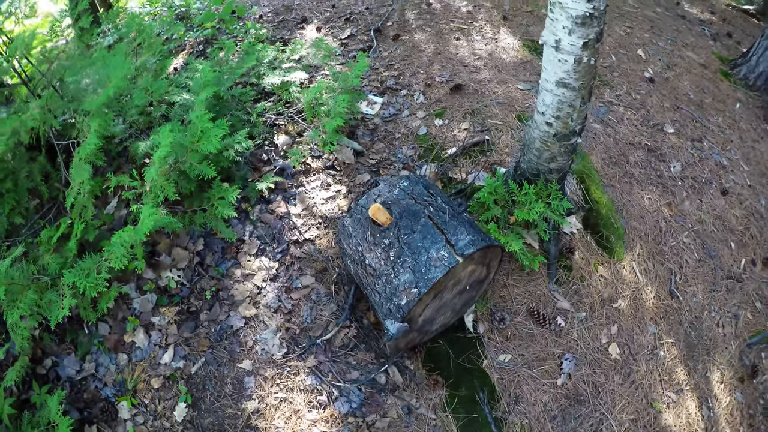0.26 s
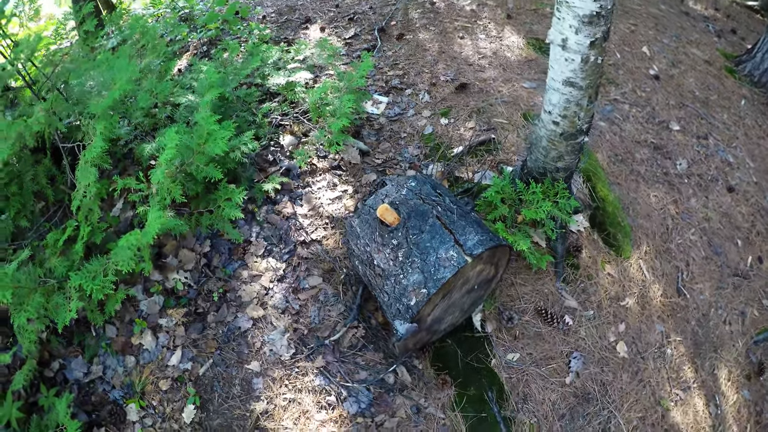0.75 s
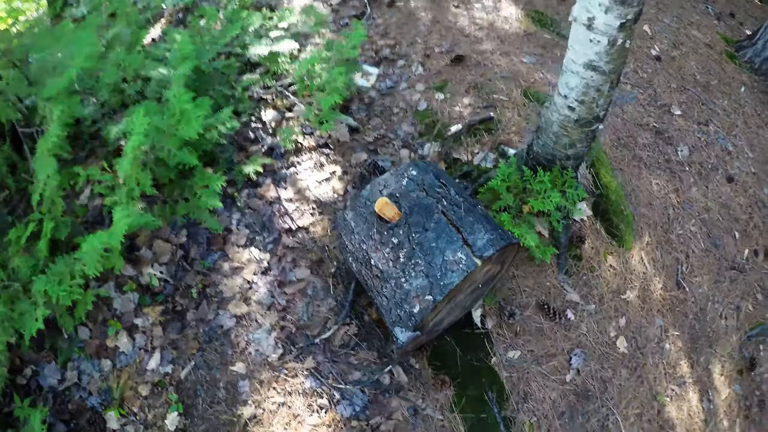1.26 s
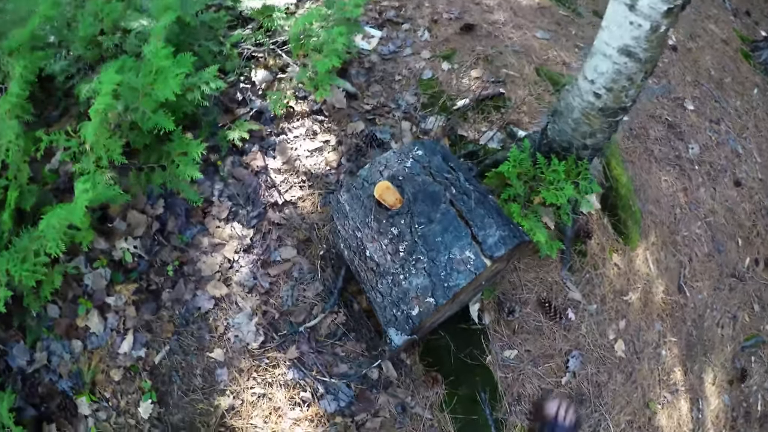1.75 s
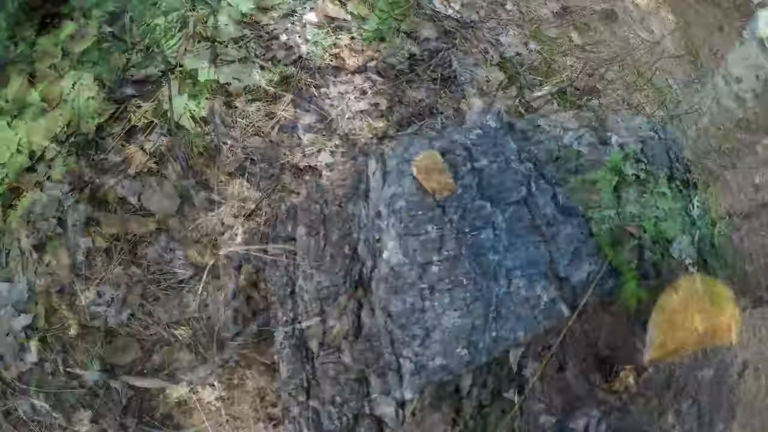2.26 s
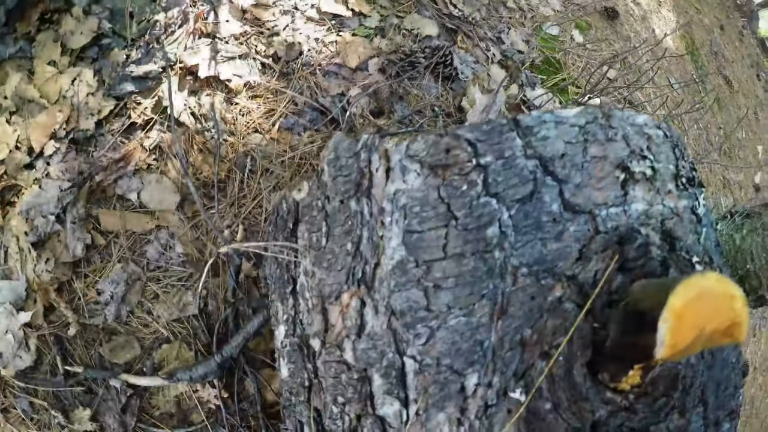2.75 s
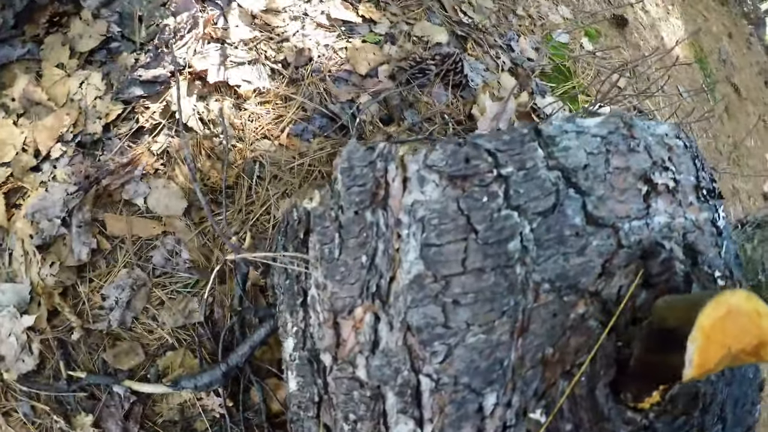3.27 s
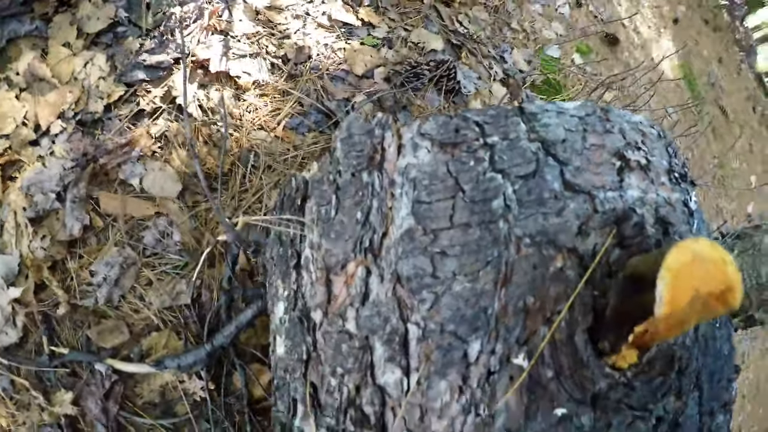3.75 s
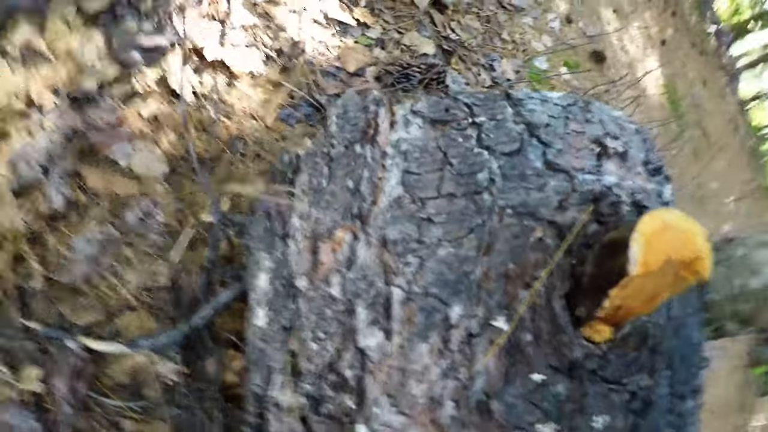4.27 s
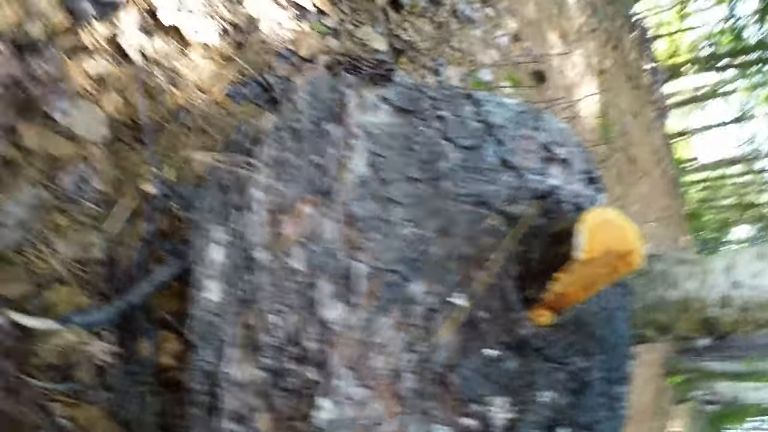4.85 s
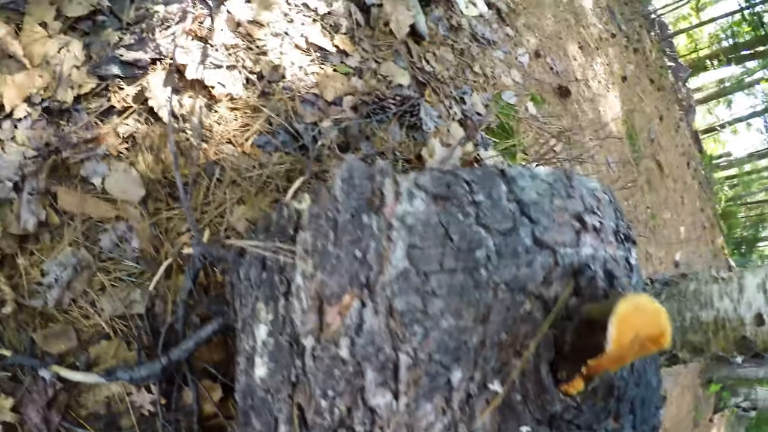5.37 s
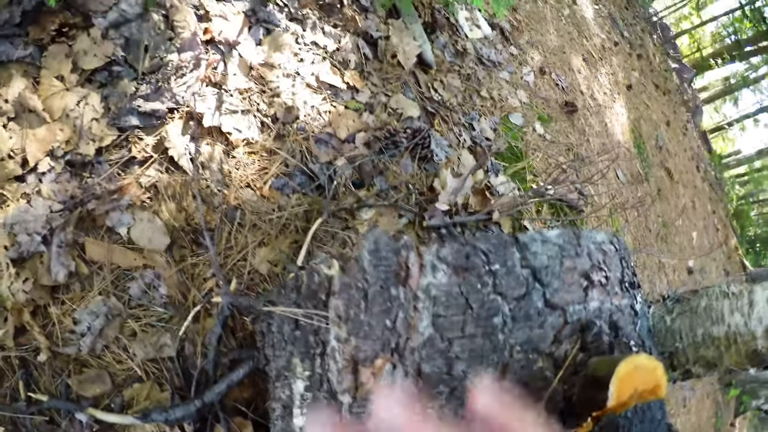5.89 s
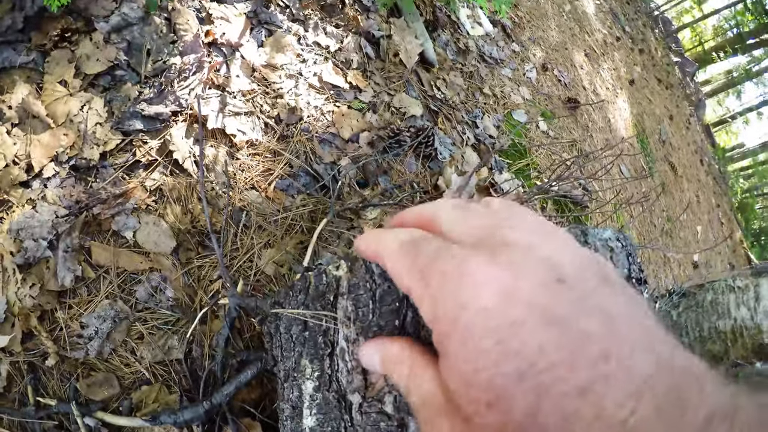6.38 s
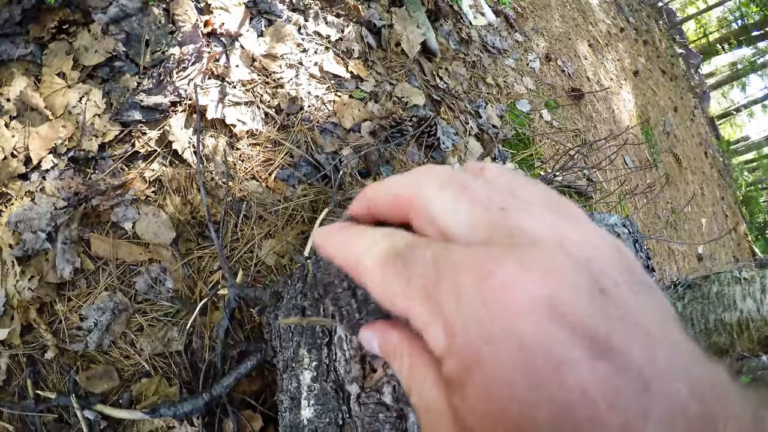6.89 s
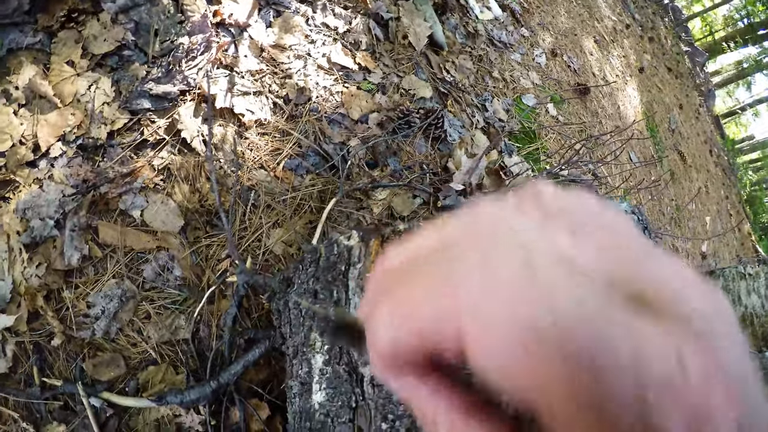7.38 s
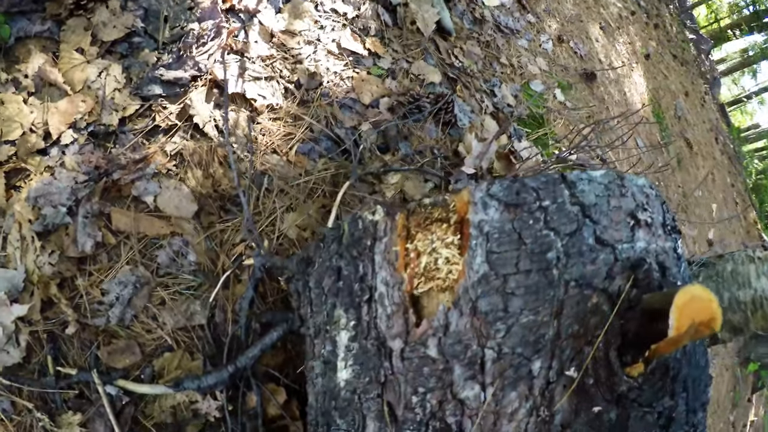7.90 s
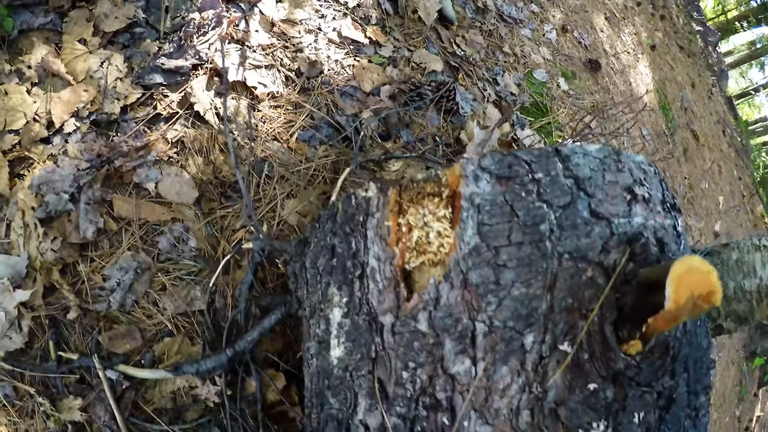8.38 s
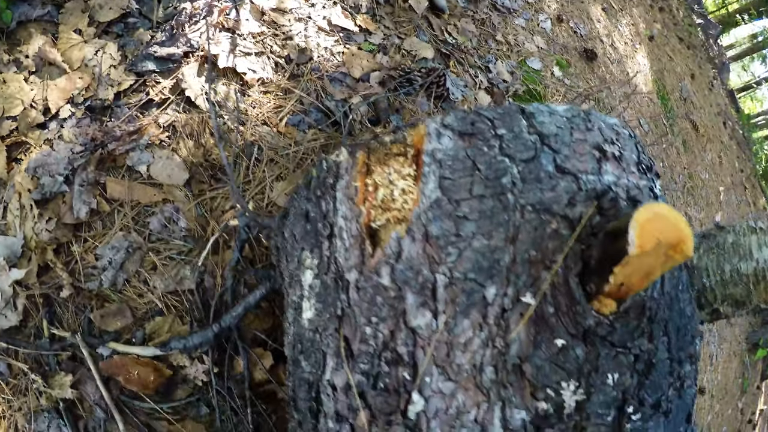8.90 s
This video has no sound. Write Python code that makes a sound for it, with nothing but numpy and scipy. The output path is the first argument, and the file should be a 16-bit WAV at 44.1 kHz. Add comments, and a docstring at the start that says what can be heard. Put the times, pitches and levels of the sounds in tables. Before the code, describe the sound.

Outdoors in a quiet wood, very close irregular cracks, clicks and short creaks of a hard plastic casing handled in the hand, sparse at first, then denser and louder. Faint soft forest hiss and distant echoing warbling birds lie behind. Around the middle a nearer bird gives speeding, falling chips. In the last third the sound opens to stereo with low wind thumps, and a dry leaf crackle comes near the end.

```python
"""The plastic housing of a small camera, in the hand and straight at the microphone, cracks and creaks.
The camera is carried close to a log in a wood: slips, creaky swells and knocks shake the housing modes.
Far songbirds, gliding sines with a diffuse echo, call over a soft forest hiss made of coloured noise.
The sound is mono at first. When the two ports open to stereo, lumpy noise and decaying low tones make
the wind, pushing them in opposite phase, and dense clicks make a dry litter rustle."""
import sys
import numpy as np
from scipy import signal
from scipy.fft import rfft, irfft, next_fast_len
from scipy.io import wavfile
from scipy.ndimage import uniform_filter1d

SR = 44100
rng = np.random.default_rng(int(sys.argv[2]) if len(sys.argv) > 2 else 0)


def to_wav(s):
    """Save 16-bit WAV."""
    ch = np.atleast_2d(s).T  # columns
    pcm = np.round(np.clip(ch, -1, 1) * 32767)  # PCM
    wavfile.write(sys.argv[1], SR, pcm.astype(np.int16))


N = 403074
T = np.arange(N) / SR


def amp(db):
    """Gain of a level in dB."""
    return 10 ** (np.asarray(db) / 20)


def rms_one(x):
    """Scale to rms 1."""
    return x / np.sqrt(np.mean(x ** 2) + 1e-20)


def in_time(rows):
    """Columns of a curve table, the first in seconds, at every sample."""
    s, *columns = np.transpose(rows)
    return [np.interp(T, s, column) for column in columns]


def drift(rate_hz):
    """Slow random wander with spread 1, straight lines between random knots."""
    knots = rng.standard_normal(int(N / SR * rate_hz) + 2)
    # straight lines between knots lose a third of the variance
    return np.interp(T * rate_hz, np.arange(len(knots)), knots) * np.sqrt(1.5)


def coloured(spectrum, channels=1):
    """Noise shaped by spectrum points of frequency and density, rms 1."""
    size = next_fast_len(N)
    hz, db = np.transpose(spectrum)
    log_hz = np.log(np.fft.rfftfreq(size, 1 / SR) + 1)
    shape = amp(np.interp(log_hz, np.log(hz), db, -70, -70))
    white = rng.standard_normal((channels, size))
    return rms_one(irfft(rfft(white) * shape, size)[:, :N])


def filtered(x, order, hz, kind):
    """Butterworth filter."""
    return signal.sosfilt(signal.butter(order, hz, kind, fs=SR, output="sos"), x)


def ring(force, hz, t60_s):
    """One damped mode: a unit click rings at height 1."""
    r, w = amp(-60 / (t60_s * SR)), 2 * np.pi * hz / SR
    return signal.lfilter([.5, 0, -.5], [1, -2 * r * np.cos(w), r * r], force + 1e-18)


def slips(per_s, spread_db):
    """Random stick-slip clicks of uneven size and either sign, rms 1."""
    sizes = amp(spread_db * np.minimum(rng.exponential(1, N), 4)) * rng.choice([-1, 1], N)
    return rms_one(sizes * (rng.random(N) < per_s / SR))


# The bed around the microphone: time_s, forest_hiss_db, microphone_hiss_db
AIR_LEVELS = [(0, -62, -75), (1.07, -67.5, -77), (2.1, -61, -70.5), (2.45, -65, -77), (3.8, -66.5, -76.5),
              (4.2, -63.5, -76), (4.95, -54.5, -63), (5.3, -63, -74.5), (6.1, -59.5, -66),
              (6.6, -60, -60.5), (7.7, -55, -59.5), (9.14, -55.5, -63)]
# Colour of the low rumble: frequency_hz, density_db (per Hz)
RUMBLE_COLOUR = [(20, 3.5), (40, 10), (70, 3), (125, -10), (250, -34), (400, -21.5)]
# Colour of the forest hiss: frequency_hz, density_db (per Hz)
FOREST_COLOUR = [(150, 15.5), (340, 11.5), (900, 6), (1900, 6.5), (2600, 8), (3600, 4.5), (4900, -6),
                 (6000, -25.5)]
# Colour of the microphone hiss: frequency_hz, density_db (per Hz)
MIC_HISS_COLOUR = [(3000, 3.5), (5000, 22), (7500, 19.5), (12500, 12.5), (15000, 1), (17000, -5)]


def air(opened, unlike=0.67, rumble_db=-56.5):
    """Both hisses throughout, differing between the ports once open; rumble only before that."""
    forest_db, hiss_db = in_time(AIR_LEVELS)
    rumble = amp(rumble_db + 4.6 * drift(7.3)) * coloured(RUMBLE_COLOUR, channels=2)
    forest = amp(forest_db + 2.0 * drift(5.5)) * coloured(FOREST_COLOUR, channels=2)
    mic_hiss = amp(hiss_db + drift(7)) * coloured(MIC_HISS_COLOUR, channels=2)
    mid, side = rumble * (1 - opened) + forest + mic_hiss
    return mid + unlike * opened * side * [[1], [-1]]


# Gusts slap the ports: start_s, level_db, pitch_hz, t60_s
PORT_SLAPS = [(6.646, -4.5, 145, 0.03), (6.921, -17.5, 75, 0.087), (7.301, -14.5, 114, 0.08),
              (7.345, -12.5, 151, 0.07), (7.456, -30, 200, 0.034), (7.567, -16.5, 100, 0.045),
              (7.627, -4.5, 81, 0.15), (7.677, -8.5, 140, 0.083), (7.741, -4, 137, 0.062),
              (7.78, -11.5, 150, 0.047), (7.967, -6, 130, 0.06), (8.61, -12, 60, 0.09),
              (8.64, -10, 60, 0.091), (8.88, -12, 75, .06)]


def slaps(length_s=.2, snap_below_hz=1100, snap_t60_s=.025):
    """Each gust is a decaying low sine; hard ones start with a dull noise snap."""
    out = np.zeros(N)
    for s, db, hz, t60_s in PORT_SLAPS:
        i = slice(int(s * SR), int((s + length_s) * SR))
        t = T[i] - s
        dull = filtered(rng.standard_normal(len(t)), 3, snap_below_hz, "low")
        # twice the dB: the snap grows with the square of the slap
        snap = amp(2 * db - 60 * t / snap_t60_s) * rms_one(dull)
        thump = amp(db - 60 * t / t60_s) * np.sin(2 * np.pi * hz * t)
        out[i] -= thump + snap
    return out


def puff(middle_s=6.6, half_length_s=0.068, level_db=-20):
    """One gust blows over the port: a low noise band that swells and fades."""
    noise = filtered(rng.standard_normal(N), 4, [150, 630], "band")
    return amp(level_db - 10 * ((T - middle_s) / half_length_s) ** 2) * rms_one(noise)


# Colour of the wind on the ports: frequency_hz, density_db (per Hz)
WIND_SPECTRUM = [(15, 4.5), (25, 5.5), (70, -3), (150, -18), (300, -35), (600, -37.5), (1300, -42.5),
                 (3000, -58)]
# Strength of the wind on the ports: time_s, level_db
WIND_LEVELS = [(6.47, -19.5), (6.9, -20.5), (7.2, -22.5), (7.5, -23.5), (7.75, -17), (8.1, -22.5),
               (8.4, -21), (8.7, -21.5), (9.14, -23)]


def wind(left_db=-7.0, opposed=0.62):
    """Lumpy pressure pushes one port as it pulls the other, stronger on the right; gusts add short thumps."""
    noise = coloured(WIND_SPECTRUM, channels=2)
    lumps_db = 4.2 * np.clip(drift(20), -2, 1.5)
    shared, own = noise * amp(in_time(WIND_LEVELS)[0] + lumps_db)
    gusts = slaps() + puff()
    left = amp(left_db) * (np.sqrt(1 - opposed ** 2) * own - opposed * shared)
    return np.array([left - 0.6 * gusts, shared + gusts])


# One dry litter rustle, a quick burst and a weaker slow fade: loudest_s, level_db, t60_s
LITTER_RUSTLE = [(8.676, -25, 0.14), (8.8, -43, 0.72)]


def litter(rise_share=0.2):
    """Dense clicks ring short bright modes: a fine dry crackle, mostly its own in each channel."""
    left, right, shared = [slips(3000, 3.5) for _ in range(3)]
    crackle = np.array([left + 0.84 * shared, right + 0.91 * shared])
    bright = ring(crackle, 6100, .002) + ring(crackle, 7300, .002) + .3 * ring(crackle, 3700, .003)
    swell = np.zeros(N)
    for s, db, t60_s in LITTER_RUSTLE:
        # the rise takes only a share of the fade
        away_s = np.maximum(T - s, (s - T) / rise_share)
        swell += amp(db - 60 * away_s / t60_s)
    return swell * amp(2.0 * drift(60)) * rms_one(bright)


def whistle(notes):
    """Bird tones: gliding sines with soft ends, from notes of (time_s, pitch_hz, level_db) points."""
    out = np.zeros(N)
    for note in notes:
        s, hz, db = np.transpose(note)
        i = np.arange(int(s[0] * SR), int(s[-1] * SR))
        glide_hz = uniform_filter1d(np.interp(i / SR, s, hz), size=500, mode="nearest")
        phase = 2 * np.pi * np.cumsum(glide_hz) / SR
        soft_ends = signal.windows.tukey(len(i), .4)
        out[i] += amp(np.interp(i / SR, s, db)) * soft_ends * np.sin(phase)
    return out


# Far warbling bird, each note glides to a turn and away:
# start_s, length_s, first_hz, turn_hz, last_hz, level_db
WARBLE_NOTES = [(.005, 0.033, 2200, 2520, 2250, -60.5), (0.372, 0.024, 2600, 2600, 2480, -59),
                (3.76, 0.075, 2800, 2770, 2700, -69), (3.894, 0.035, 2900, 2750, 2700, -70),
                (4.37, 0.047, 3550, 3510, 3460, -61), (6.25, .04, 2550, 2770, 2740, -64),
                (6.27, 0.021, 3150, 3400, 3300, -64), (0.072, 0.043, 2590, 2580, 2730, -55),
                (0.283, 0.037, 2960, 2970, 2830, -56), (0.399, 0.054, 3000, 3500, 2950, -58),
                (.51, 0.028, 2700, 2550, 2410, -58.5), (0.541, 0.048, 2950, 3520, 2740, -55.5),
                (1.335, 0.097, 4000, 4600, 4420, -62), (1.445, .04, 2820, 3300, 3440, -62),
                (1.66, 0.038, 2510, 2650, 2750, -63), (1.695, 0.031, 2800, 2240, 2780, -56),
                (1.73, 0.027, 2830, 2600, 2250, -54), (1.835, 0.019, 3350, 3030, 2850, -59),
                (1.8, 0.071, 3420, 3560, 3780, -64), (3.14, 0.047, 3750, 3350, 3130, -60),
                (3.19, 0.057, 3950, 5230, 3600, -59.5), (3.242, 0.016, 3050, 3400, 3770, -56.5),
                (3.278, 0.074, 2950, 1950, 3260, -60.5), (3.355, 0.058, 3900, 5150, 3830, -59),
                (3.481, 0.071, 2350, 3870, 2660, -58), (3.526, 0.054, 2690, 2460, 2150, -59),
                (3.59, 0.068, 2150, 2960, 2800, -59), (4.423, 0.071, 3370, 3350, 3300, -59),
                (4.497, 0.064, 4360, 4310, 4300, -61), (6.121, 0.062, 2750, 3520, 2400, -55),
                (6.196, 0.062, 2600, 3600, 2060, -54), (6.31, 0.02, 2750, 2300, 2300, -62),
                (6.326, 0.052, 2300, 4600, 2650, -54.5), (6.377, 0.052, 2380, 2710, 2460, -53.5),
                (7.215, 0.04, 4340, 4050, 3850, -56), (7.285, 0.053, 4370, 4430, 4570, -55),
                (7.48, 0.059, 2500, 2460, 2480, -52.5), (7.948, .05, 4350, 4360, 4560, -62),
                (8.301, 0.091, 3220, 3150, 3080, -56.5), (1.553, 0.1, 4910, 4460, 4660, -72)]


def warbling_bird(turn_at=0.56):
    """Far song of short glides that turn at a share of their length."""
    notes = [[(s, first_hz, db), (s + turn_at * length_s, turn_hz, db), (s + length_s, last_hz, db)]
             for s, length_s, first_hz, turn_hz, last_hz, db in WARBLE_NOTES]
    return whistle(notes)


# Nearer bird, falling chips that speed up: start_s
CHIP_STARTS = [5.333, 5.58, 5.79, 5.947, 6.067, 6.177, 6.286, 6.392, 6.496, 6.601]
# Shape of every chip: after_start_s, pitch_hz, level_db (relative to the chip level)
CHIP_GLIDE = [(0, 5950, -2), (.012, 5550, 0), (.034, 4100, -20)]


def chipping_bird(chip_db=-44.5):
    """Nearer song of equal chips, each falling in pitch."""
    return whistle([[(s + after_s, hz, chip_db + db) for after_s, hz, db in CHIP_GLIDE]
                    for s in CHIP_STARTS])


def birds(echo_db=-2, echo_t60_s=.65, near_echo_db=-8):
    """Trunks scatter the song into a diffuse tail, less so for the nearer chipping bird."""
    far = warbling_bird() * amp(3.5 * drift(70))   # the level of the far song flickers at random
    near = chipping_bird()
    tail = rng.standard_normal(SR) * amp(-60 * T[:SR] / echo_t60_s)
    echo = signal.fftconvolve(far + amp(near_echo_db) * near, tail / np.linalg.norm(tail))[:N]
    return far + near + amp(echo_db) * echo


# Short creaky swells of the housing, the tails of cracks and longer drags:
# middle_s, length_s (about 10 dB down at its ends), level_db, treble_db (relative to level)
CREAKY_SWELLS = [(0.144, 0.044, -38, -15), (0.201, 0.031, -36, -17), (0.263, 0.062, -33, -13.5),
                 (0.456, 0.017, -45.5, -18.5), (0.972, 0.025, -29.5, -18), (1.02, 0.051, -40, -16.5),
                 (1.13, 0.04, -51.5, -15), (1.332, 0.016, -37.5, -26), (1.41, 0.043, -37.5, -19),
                 (1.517, 0.064, -35.5, -16.5), (1.596, 0.027, -49, -21), (1.782, 0.025, -46.5, -24),
                 (2.012, 0.037, -37, -15), (2.147, 0.052, -51.5, -9), (2.196, 0.038, -37, -12),
                 (2.238, 0.03, -42.5, -11.5), (2.318, 0.046, -48.5, -13), (2.362, 0.065, -33.5, -21),
                 (2.437, 0.025, -48, -27), (2.633, 0.04, -39, -21.5), (2.827, 0.09, -41, -13.5),
                 (2.913, 0.037, -37, -14), (3.082, 0.052, -34.5, -21.5), (3.131, 0.05, -52, -17),
                 (3.848, 0.057, -38, -14), (3.902, 0.023, -35.5, -11.5), (4.025, 0.026, -35.5, -22.5),
                 (4.073, 0.033, -24.5, -20), (4.117, 0.0095, -32, -20.5), (4.227, 0.028, -35.5, -13.5),
                 (4.307, 0.17, -45.5, -14), (4.435, 0.046, -31.5, -18.5), (4.488, 0.036, -39.5, -21),
                 (4.717, 0.011, -18, -15), (4.754, 0.018, -24.5, -23), (4.79, 0.049, -36.5, -19),
                 (4.903, 0.058, -47, -9), (5.179, 0.013, -37.5, -11), (5.348, 0.02, -38, -11.5),
                 (5.504, 0.071, -40.5, -30), (5.577, 0.016, -16, -9), (5.606, 0.034, -29.5, -7),
                 (5.781, 0.012, -18.5, 2.5), (5.84, 0.071, -37, -8.5), (5.907, 0.024, -44.5, -5),
                 (5.999, 0.024, -32, -16), (6.473, 0.038, -34.5, -14), (6.65, 0.017, -15.5, -7.5),
                 (6.787, 0.068, -35, -6.5), (6.857, 0.019, -32, -14), (6.888, 0.025, -31, -7),
                 (7.385, 0.03, -38, -17), (7.448, 0.042, -38.5, -28), (7.585, 0.017, -28, -9),
                 (7.641, 0.036, -32, -12.5), (7.743, 0.006, -18, 0), (7.837, 0.012, -23.5, -5.5),
                 (7.876, 0.036, -29, -1.5), (8.423, 0.0085, -31, -2), (8.473, 0.038, -38, -8),
                 (8.51, 0.01, -20, -9.5), (8.555, 0.088, -44, -18), (8.677, 0.044, -31, -38),
                 (8.868, 0.012, -18.5, -1.5)]
# Force of a swell on the thud, body, edge and treble modes: level_db
SWELL_FORCE_DB = [-25.5, -23.5, -20, -13]


def creaks(steep=2.36, rise_faster=1.083, edge_follows=0.9):
    """Dense stick-slip clicks force the thud, body, edge and treble modes in short swells."""
    force = np.zeros((4, N))
    # the edge modes follow most of a swell's treble level
    treble_share = np.array([[0], [0], [edge_follows], [1]])
    for s, length_s, db, treble_db in CREAKY_SWELLS:
        i = slice(int((s - 2 * length_s) * SR), int((s + 2 * length_s) * SR))
        away_s = np.maximum(T[i] - s, rise_faster * (s - T[i]))
        swell_db = -10 * (away_s * 2 / length_s) ** steep
        force[:, i] += amp(db + swell_db + treble_db * treble_share)
    lumps = amp(4.5 * drift(220))
    ticks = 1.1 * slips(300, 2.5)   # single coarse slips among the fine ones
    return force * lumps * (slips(2500, 2.3) + ticks) * amp(np.c_[SWELL_FORCE_DB])


# The housing slips in the hand with a crack:
# start_s, level_db, bright_db (upper modes, relative to level), thud_db (relative to level)
HOUSING_CRACKS = [(0.132, -15, -9, -5), (0.202, -14.5, -4, -24), (0.239, -9, -19, -26),
                  (0.249, -13, -11, -20), (0.265, -24, -2, -17), (0.454, -35, -26, -18),
                  (0.779, -28.5, -19.5, 7.5), (0.976, -17, -18, -35), (0.993, -24, -14, 2),
                  (1.016, -20.5, -16, -9), (1.132, -37, -6, -19), (1.143, -43, -4, 3),
                  (1.242, -42, -9, 12.5), (1.327, -21.5, -3, -22), (1.37, -28, -12, -2),
                  (1.399, -29, -10, -20), (1.508, -16, -6.5, -9), (1.539, -18.5, -9, -4.5),
                  (1.777, -38.5, -19, 0.5), (1.921, -35, 9, -19), (1.975, -2, -5.5, -42),
                  (1.988, -11.5, -3.5, -20), (1.998, -9, -8, -22), (2.007, -10.5, -27, -16),
                  (2.149, -29.5, 5, -29), (2.229, -15.5, -7.5, -11), (2.305, -26, -18, -19),
                  (2.416, -41, -18, -4), (2.447, -38, -16, 7), (2.615, -11.5, -17.5, -9),
                  (2.831, -18.5, -2.5, -17), (2.919, -16, -18.5, -18), (3.055, -32, -29, -3.5),
                  (3.848, -23.5, -1.5, -20), (3.862, -31, -12, -14), (3.905, -24, -7, -22),
                  (3.947, -40, -20, -3), (4.009, -21.5, -22, -29), (4.057, -21, -19, -25),
                  (4.115, -19, -27, -30), (4.215, -27, -9, -11), (4.285, -15, -23, -10),
                  (4.328, -25.5, -9, -20), (4.352, -15.5, -7.5, -18), (4.487, -30, -20, -9),
                  (4.669, -13, -6, -8), (4.686, -5, -3, -16), (4.715, -13, 0, -36), (4.757, 1.5, -7, -22),
                  (4.785, -15, -30, -10), (4.86, -21, -4, -36), (4.87, -29, 1, -25),
                  (4.889, -14.5, -4, -18), (4.897, -7, 1.5, -15.5), (5.185, -30, -10, 0),
                  (5.299, -47.5, 11, -22), (5.348, -41, -13, -14), (5.481, -21.5, -18.5, -14),
                  (5.512, -16.5, -14.5, -14), (5.534, -21.5, -8.5, 10), (5.561, -1, -9, -14),
                  (5.575, -12.5, -9, -10), (5.629, -16, 7, -9.5), (5.778, -3, -3, -33),
                  (5.802, -23, -3, -14), (5.826, -18, -10, -23), (5.872, -25, -17, -20),
                  (5.899, -24.5, -19, -23), (5.982, -26, -0.5, -15), (6.002, -8.5, -2.5, -24),
                  (6.371, -29.5, -19, -15), (6.447, -15, -8.5, -3), (6.472, -3.5, -1.5, -6.5),
                  (6.638, -16.5, 0, -16), (6.645, -5.5, -36, -19), (6.667, -4, 0, -13),
                  (6.694, -16.5, -8, -9), (6.706, -22, 3, -17), (6.799, -7.5, 4, -40),
                  (6.806, -23.5, 10, -13), (6.841, -7, -7, -38), (6.861, -1.5, -0.5, -33),
                  (6.886, -21.5, -27, 4), (6.895, -12, -7, -13), (7.118, -6, 1.5, -15),
                  (7.177, -22, -7, -17), (7.195, -28, -10, -13), (7.364, -30, -15, 0),
                  (7.432, -19, -8, 1.5), (7.451, 0.5, -10, -7), (7.583, -4.5, -6, 3.5),
                  (7.603, -20.5, 2.5, -6), (7.629, -13, -5, -8), (7.742, -9, -11, -16),
                  (7.818, -30.5, 6, -20), (7.834, -5.5, 0, -35), (7.856, -26, 4, -12),
                  (7.876, -7.5, -8, -20), (7.966, -30, -29, 16), (8.42, -31, -4, -3), (8.428, -28, 0, -8),
                  (8.458, -21, -2.5, 1.5), (8.509, -30, 1, -7), (8.535, -15.5, -9.5, -3),
                  (8.555, -15.5, -10, -9), (8.689, -16, -5, -26), (8.863, 1.5, -6.5, -10)]
# Force of a crack on the thud, body, edge and treble modes: level_db
CRACK_FORCE_DB = [-5.5, -11.5, -7.5, -5.5]
# A fingertip knocks the shell: start_s, level_db
FINGER_KNOCKS = [(8.422, -9), (8.666, -13), (8.817, -19)]
# Modes of the plastic housing: pitch_hz, level_db, t60_s (capped for the upper modes)
HOUSING_MODES = [(122.7, -4, 0.078), (210.3, -6.5, 0.085), (301, -8, 0.022), (501, -27.5, 0.0073),
                 (587, -8.5, 0.02), (753, -10, 0.021), (1118, -3, 0.0072), (1450, 0.97, 0.0051),
                 (1820, -20.5, 0.0053), (2000, 3.5, 0.0024), (2780, -4, .004), (3383, -0.5, 0.0088),
                 (3720, -8, 0.0056), (4700, -31, .004), (5680, 0.5, 0.0005), (6870, -21, 0.0036),
                 (8340, -8, 0.0027), (9740, -13, 0.0026), (11070, -13, 0.0058), (12280, -11, 0.0017),
                 (15000, -7, 0.0057)]


def housing(scatter_db=3, chatter=.3, chatter_t60_s=.009, upper_t60_s=.0035):
    """Cracks (one slip and a dying chatter), creaks (dense slips) and knocks shake the same modes."""
    s, level_db, bright_db, thud_db = np.transpose(HOUSING_CRACKS)
    after = np.arange(1200)   # samples since the crack
    hits = (s * SR).astype(int)[:, None] + after
    chance = rng.standard_normal((len(s), len(HOUSING_MODES) + 1))
    bursts = chatter * slips(5000, 3.0)[np.minimum(hits, N - 1)]
    bursts[:, 0] = 1   # the first slip
    bursts *= amp(-60 * after / SR / (chatter_t60_s * np.exp(0.3 * chance[:, -1:])))
    crack_db = level_db + np.c_[CRACK_FORCE_DB] + np.array([thud_db, 0 * s, bright_db, bright_db])
    creak_force = creaks()
    knock_at = [int(knock_s * SR) for knock_s, db in FINGER_KNOCKS]
    knock_force = amp([db for knock_s, db in FINGER_KNOCKS])
    out = np.zeros((4, N))
    for (hz, mode_db, t60_s), own in zip(HOUSING_MODES, chance.T):
        part = np.searchsorted([400, 2500, 5000], hz)   # thud, body, edge or treble, split in Hz
        # each mode's strength wanders at random, so the creak changes colour
        wander = amp(4 * drift(25))
        force = np.append(creak_force[part] * wander, np.zeros(len(after)))
        own_db = scatter_db * own * (part > 0)   # thud modes do not scatter
        np.add.at(force, hits, amp(crack_db[part] + own_db)[:, None] * bursts)
        if 450 < hz < 800:   # only these modes answer the knocks
            force[knock_at] += knock_force
        # the upper modes die away quickly: their t60 is capped
        capped_s = min(t60_s, upper_t60_s) if part > 1 else t60_s
        out[part] += amp(mode_db) * ring(force[:N], hz, capped_s)
    # each part of the shell passes its own range in Hz; a dip lies below the treble
    passes = [(20, 450), (250, 2300), (2550, 4650), (5600, 13500)]
    return sum(filtered(x, 4, hz, "band") for hz, x in zip(passes, out))


def scene(stereo_from_s=6.47, opening_s=0.0023):
    """Housing and birds in the middle, wind and litter on the opened ports."""
    opened = np.clip((T - stereo_from_s) / opening_s, 0, 1)
    return housing() + birds() + air(opened) + opened * wind() + litter()


def record(dry, cutoff_hz=16900):
    """The loudest cracks are rounded by soft saturation, then a steep low-pass cuts the top."""
    rounded = .95 * np.tanh(dry / .95)
    return signal.sosfilt(signal.cheby2(14, 90, cutoff_hz, fs=SR, output="sos"), rounded)


dry = scene()
out = record(dry)
to_wav(out)
```